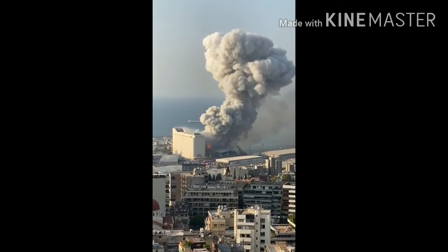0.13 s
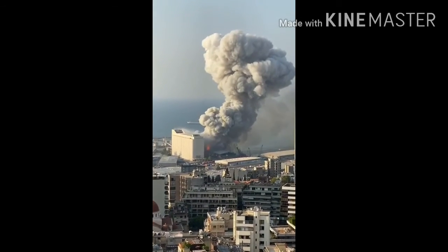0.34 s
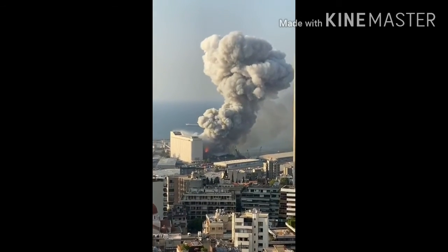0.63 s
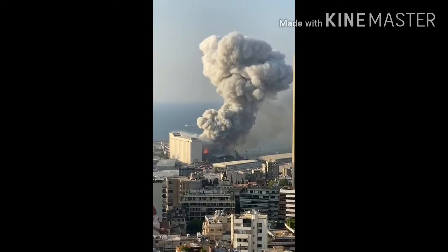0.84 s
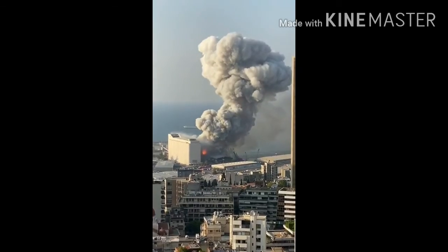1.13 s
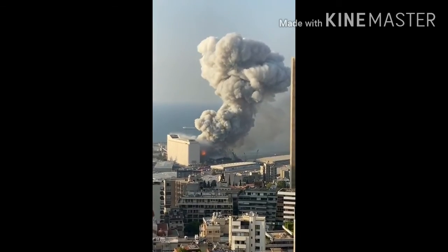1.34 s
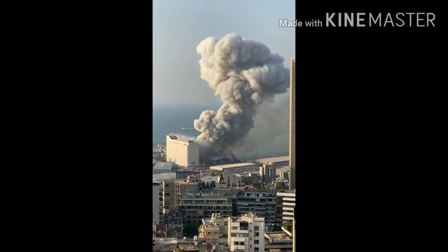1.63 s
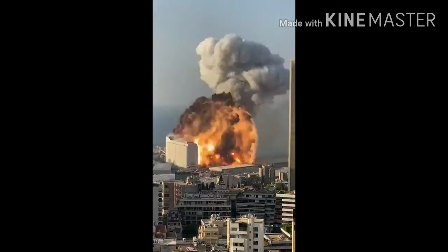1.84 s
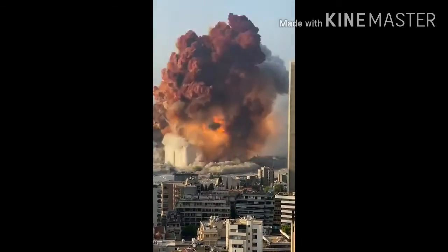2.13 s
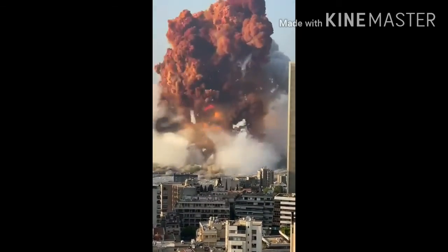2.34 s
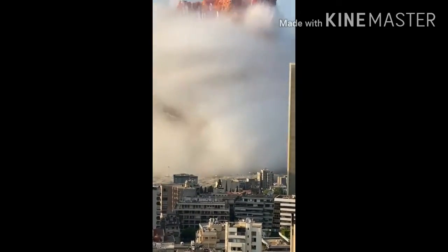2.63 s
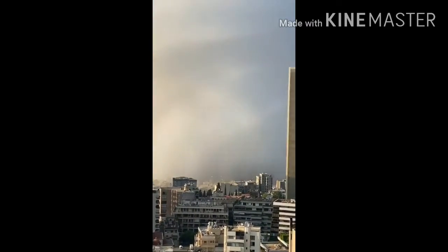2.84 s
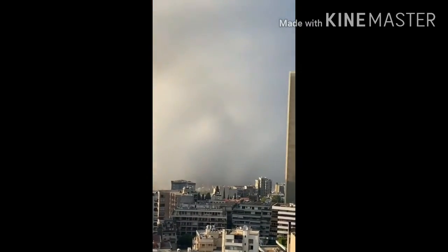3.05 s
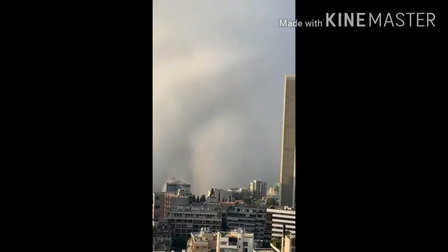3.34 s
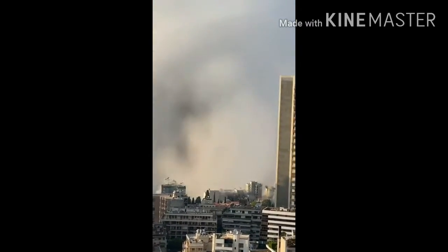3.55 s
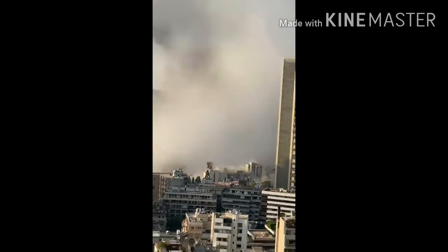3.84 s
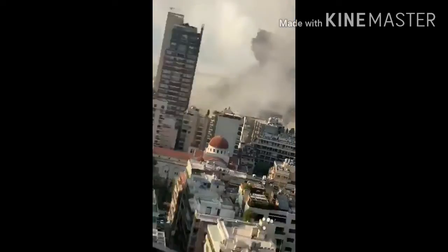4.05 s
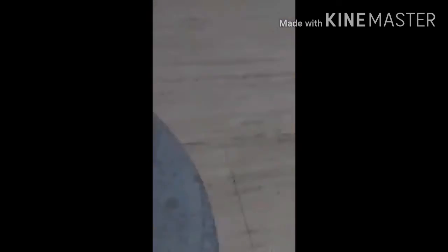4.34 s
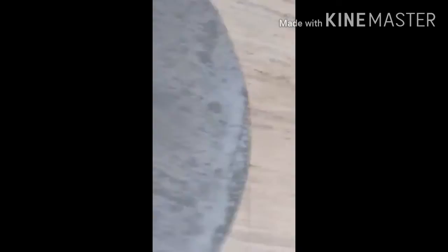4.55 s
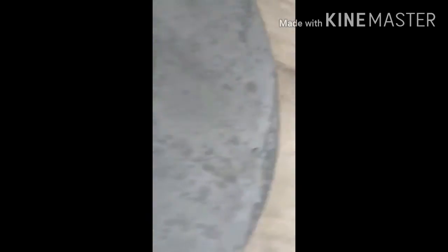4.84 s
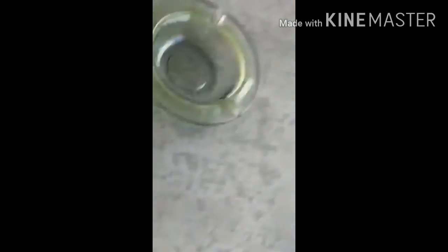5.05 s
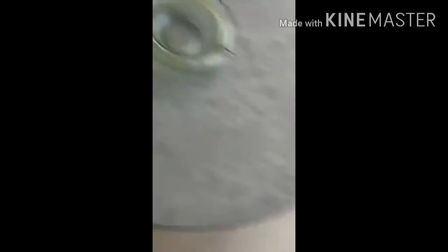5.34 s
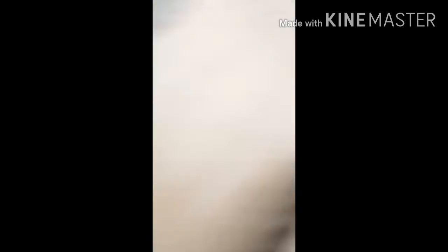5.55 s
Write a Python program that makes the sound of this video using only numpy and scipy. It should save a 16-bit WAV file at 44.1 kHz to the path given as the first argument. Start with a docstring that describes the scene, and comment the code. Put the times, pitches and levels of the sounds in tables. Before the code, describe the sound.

Steady muffled roar of a city fire, flickering and popping, heard from afar by a handheld phone. Then a heavy tremor swells in, building fittings chatter and hiss, and the rumble surges while slowly fading. Bumps and one hollow knock come as the phone drops towards the floor. Suddenly a far louder blast snaps, booms and distorts close at the microphone, with torn wind and falling bits.

```python
"""A huge fire roars across a city, heard by a phone on a balcony: clumped noise, with random pops and pressure pulses.
It explodes: the ground tremor comes first, and the building rumbles, rattles and hisses as bands of shaped noise.
Handling adds noise swells and a modal knock; as the phone sinks, the floor's echo combs the surrounding sound.
Then the air shock cracks over the phone as pressure jumps with port booms, its wind buffets and rasps
as gusting noise at both ports, and debris clatters down as scrapes with damped modes."""
import sys
import numpy as np
from scipy import signal
from scipy.fft import rfft, irfft, next_fast_len
from scipy.io import wavfile
from scipy.ndimage import uniform_filter1d, map_coordinates

SR = 44100
rng = np.random.default_rng(int(sys.argv[2]) if len(sys.argv) > 2 else 0)


def materialize(psi):
    """Save the field psi as 16-bit PCM at rate SR to the path in sys.argv[1].

    A 1-D psi becomes a single channel; in a 2-D psi each row is a channel.
    """
    bounded = np.clip(np.atleast_2d(psi).T, -1, 1)
    quanta = np.round(bounded * 32767).astype(np.int16)
    wavfile.write(sys.argv[1], SR, quanta)


N = 250929

# The ground wave: its first stir, then the main jolt (s).
STIR_S, JOLT_S = 2.354, 2.695
# The phone turns down, away from the street (s).
TURN_S, TURN_LENGTH_S = 4.2, 0.26


def amp(db):
    """Level law: decibels to an amplitude gain."""
    return 10 ** (np.asarray(db) / 20)


def unit(x):
    """Normalisation of x to an rms of 1."""
    return x / np.sqrt(np.mean(x ** 2) + 1e-20)


def even(x, window):
    """Short-term power equalisation: x at a steady strength, judged over window seconds."""
    power = uniform_filter1d(np.mean(x ** 2, axis=0), size=max(int(window * SR), 1))
    return unit(x / np.sqrt(np.abs(power) + 1e-6))


def along(points, hz):
    """Interpolation of (Hz, value) points on a logarithmic frequency axis."""
    point_hz, values = np.transpose(points)
    return np.interp(np.log(hz + 1), np.log(point_hz + 1), values)


def levels(rows):
    """Level contours: one gain track for each dB column, falling at 60 dB/s after the last row."""
    times, *columns = np.transpose(rows)
    t = np.arange(N) / SR
    fall_db = 60 * np.maximum(t - times[-1], 0)
    return [amp(np.interp(t, times, column) - fall_db) for column in columns]


def wobble(rate):
    """Slow random modulation: a smooth curve through rate random knots a second."""
    knots = rng.standard_normal(int(N * rate / SR) + 4)
    return map_coordinates(knots, [np.arange(N) * rate / SR])


def envelope(start, attack, ebb_db_per_s=0, hold=0):
    """Linear attack to 1, hold, then exponential decay."""
    age = np.arange(N) / SR - start
    return np.clip(age / attack, 0, 1) * amp(-ebb_db_per_s * np.maximum(age - attack - hold, 0))


def swell(s, half_width):
    """Gaussian hump of height 1 around time s, falling to 1/e at the half width."""
    hump = np.zeros(N)
    first = max(int((s - 3 * half_width) * SR), 0)
    last = min(int((s + 3 * half_width) * SR), N)
    near = np.arange(first, last)
    hump[near] = np.exp(-((near / SR - s) / half_width) ** 2)
    return hump


def swells(rows):
    """Superposition of humps given as (s, peak dB, half width s)."""
    return sum(amp(db) * swell(s, half_width) for s, db, half_width in rows)


def filtered(x, response):
    """Linear filtering: the spectrum of x times a response of frequency."""
    size = next_fast_len(N + SR // 4)
    spectrum = rfft(x, size) * response(np.fft.rfftfreq(size, 1 / SR))
    return irfft(spectrum, size)[..., :N]


def paired(pair, spectrum, width):
    """Mid-side stereo: two unrelated signals become left and right with a colour and a width."""
    def shares(hz):
        angle = np.arctan(amp(along(width, hz)))
        return amp(along(spectrum, hz)) * [np.cos(angle), np.sin(angle)]

    mid, side = filtered(pair, shares)
    return unit(np.array([mid + side, mid - side]))


def noise(spectrum, width, grain_db, grain_rate):
    """Modulated noise: stereo, rms 1, its strength wandering at grain_rate knots a second."""
    grains = amp(grain_db * wobble(grain_rate))
    return paired(rng.standard_normal((2, N)) * grains, spectrum, width)


def add(track, s, sound):
    """Superposition of a short sound on a track at time s."""
    part = track[..., round(s * SR):][..., :sound.shape[-1]]
    part += sound[..., :part.shape[-1]]


def push(hz, cycles):
    """Damped oscillation: a pressure pulse of peak 1 that swings a few times."""
    turns = hz * np.arange(SR // 8) / SR
    swing = np.sin(2 * np.pi * turns) * turns * np.exp(-2 * turns / cycles)
    return swing / np.abs(swing).max()


# Course of the fire. Each row: time in seconds, roar and rush in dB before brief swings and a small lift.
FIRE_COURSE = [(0, -16.5, -26.5), (.4, -18, -27), (.62, -17, -29), (.78, -17, -27), (1.35, -16, -28.5),
               (2.08, -20, -29), (2.22, -19, -31.5), (2.55, -22, -32.5), (2.85, -22, -29.5),
               (4.5, -23.5, -35), (5.05, -23.5, -33)]
# Brief flares and dips of the fire. Each row: centre in seconds, roar gain in dB, rush gain in dB,
# half width in seconds.
FIRE_SWINGS = [(.3, 2, 1, 0.07), (.64, -0.5, -0.5, 0.039), (.805, 2, 2, 0.026), (1.019, -4.5, 1, 0.012),
               (1.168, 0.5, 3.5, 0.014), (1.283, 1.5, 5.5, 0.03), (1.44, -1, 4, 0.046),
               (1.575, -0.5, -1, 0.018), (1.645, -3, 0.5, 0.015), (2.02, 2, -0.5, 0.073),
               (2.155, 0.5, -2, 0.025), (2.41, 3, 1.5, 0.031)]
# Spectra of roar and rush. Each row: frequency in Hz, relative density in dB per Hz.
ROAR_SPECTRUM = [(15, -71.5), (25, -34), (43, -21), (60, -15), (87, -6), (124, -5), (151, -1), (184, -5.5),
                 (210, -1), (300, -0.3), (400, -3.5), (494, -5.5), (591, -4.5), (657, -10), (900, -18),
                 (1170, -52.5), (1980, -120)]
RUSH_SPECTRUM = [(500, -33.5), (700, -3), (1050, -5.5), (1400, -13), (2000, -19.5), (3000, -30.5),
                 (4300, -45.5), (5500, -59.5), (9000, -81.5), (12000, -86.5)]
# Stereo width of far sound. Each row: frequency in Hz, side minus mid in dB.
FAR_WIDTH = [(100, -70), (190, -33), (260, -23), (350, -14), (600, -7.5), (900, -5), (1130, -5.5),
             (1450, -10), (1800, -19), (2600, -14), (3200, -15), (3700, -32), (5500, -24), (6500, -15),
             (9000, -11)]
# Far sound favours the left port. Each row: frequency in Hz, left minus right in dB.
LEFT_LEAN = [(310, 0), (400, 1.6), (540, 3.4), (650, 1), (800, 3.8), (1130, 3.8), (1700, .3), (3500, 0)]


def fire():
    """Incoherent summation: countless far bursts merge into a roar and a brighter rush that rise and dip."""
    roar, rush = levels(FIRE_COURSE)
    roar_db = sum(db * swell(s, half_width) for s, db, _, half_width in FIRE_SWINGS) + 0.73 * wobble(10)
    rush_db = sum(db * swell(s, half_width) for s, _, db, half_width in FIRE_SWINGS)
    low = roar * amp(0.7 + roar_db) * noise(ROAR_SPECTRUM, FAR_WIDTH, grain_db=0.5, grain_rate=56)
    high = rush * amp(1.15 + rush_db) * noise(RUSH_SPECTRUM, FAR_WIDTH, grain_db=0.5, grain_rate=63)
    halves = np.array([[.5], [-.5]])
    return filtered(low + high, lambda hz: amp(along(LEFT_LEAN, hz) * halves))


# Pops until the ground stirs: rate, peak over the roar for the lowest and strongest, random spread, pitch range.
POPS_PER_S = 22
POP_DB, POP_SPREAD_DB, POP_LOW_HZ, POP_HIGH_HZ = 3, 14, 327, 1260


def pops():
    """Random impulse sources: small far detonations follow the roar's level, weaker at higher pitch."""
    out = np.zeros(N)
    roar, _ = levels(FIRE_COURSE)
    for when, size, pitch in rng.uniform(size=(int(POPS_PER_S * STIR_S), 3)):
        hz = POP_LOW_HZ * (POP_HIGH_HZ / POP_LOW_HZ) ** pitch
        strength = amp(POP_DB - POP_SPREAD_DB * size) * POP_LOW_HZ / hz
        add(out, when * STIR_S, strength * push(hz, cycles=1.2))
    return roar * out


# Small things click and squeak as they shift. Each row: start in seconds, initial scuff level in dB,
# pitch in Hz, ring over scuff in dB, decay by 60 dB in seconds.
SMALL_CLICKS = [(.695, -58, 6460, -15.5, 0.1), (2.361, -51.5, 7040, -24, 0.071),
                (2.947, -42, 4430, -2, .05), (4.155, -26.5, 7600, -26, 0.0089),
                (4.545, -55.5, 4020, 17, 0.04)]


def clicks():
    """Damped resonance: a tiny noise scuff and a ring die away together."""
    out, t = np.zeros(N), np.arange(SR // 16) / SR
    for s, db, hz, ring_db, t60 in SMALL_CLICKS:
        ring = amp(ring_db) * np.sin(2 * np.pi * hz * t)
        scuff = rng.standard_normal(len(t))
        add(out, s, amp(db - 60 * t / t60) * (scuff + ring))
    return out


# The hand jerks and bumps the phone. Each row: centre in seconds, peak level in dB, half width in seconds.
HAND_BUMPS = [(4.015, -34, 0.011), (4.155, -17.5, 0.015), (4.395, -30, .012), (4.655, -25.5, 0.013)]
# Fingers rustle on the case. Each row: centre in seconds, peak level in dB, half width in seconds.
CASE_RUSTLES = [(.715, -65, .025), (1.3, -68, .022), (1.45, -71, .025), (1.92, -69, .02), (4.16, -46, .025)]
# Spectrum of a bump. Each row: frequency in Hz, relative density in dB per Hz.
BUMP_SPECTRUM = [(90, -19), (240, -10), (420, 8), (600, -15), (900, -21), (2000, -53)]
# Stereo width of sound made at the ports. Each row: frequency in Hz, side minus mid in dB.
NEAR_WIDTH = [(60, -25), (130, -17), (200, -11.5), (270, -8), (500, 0), (1200, 0), (1900, -11), (2600, -7),
              (3600, -13), (5500, -9), (7000, -5), (9000, -2.5)]


def handling():
    """Contact noise: the hand bumps the phone dully and rustles on its case."""
    bump = even(noise(BUMP_SPECTRUM, NEAR_WIDTH, grain_db=6, grain_rate=430), window=0.033)
    rustle = noise(HISS_SPECTRUM, NEAR_WIDTH, grain_db=2.0, grain_rate=170)
    return swells(HAND_BUMPS) * bump + swells(CASE_RUSTLES) * rustle


# Dull thumps. Each row: start in seconds, peak in dB, pitch in Hz.
DULL_THUMPS = [(0.721, -2, 230), (0.756, -12, 340), (.856, -8.5, 382), (1.091, -3, 270), (1.222, -7.5, 385),
               (1.775, -5.5, 264), (2.615, -18, 70), (2.658, -15, 86), (2.692, -5.5, 93), (4.003, -11, 280),
               (4.387, -12.5, 500), (4.562, -21, 300), (4.635, -13.5, 444), (5.131, -7.5, 92),
               (5.143, -9, 149), (5.159, -10.5, 167), (5.229, -9, 130), (5.341, -7, 82), (5.348, -9, 151),
               (5.402, -15, 103), (5.459, -14, 141), (5.617, -6.5, 81), (5.657, -10, 276)]


def thumps():
    """Long wavelengths: each thump is one low swing of pressure, alike at both ports."""
    out = np.zeros(N)
    for s, db, hz in DULL_THUMPS:
        add(out, s, amp(db) * push(hz, cycles=0.99))
    return out


# The first deep heave of the ground.
HEAVE_S, HEAVE_HOLD_S, HEAVE_DB = 2.41, 0.38, -29.5
# The rumble builds up to the jolt, then ebbs; random troughs deepen as the square of a wobble.
RUMBLE_DB, RUMBLE_EBB_DB_PER_S, TROUGH_DB, TROUGH_KNOTS_PER_S = -19.5, 2.5, 0.2, 13
# Strongest surges and troughs. Each row: centre in seconds, gain in dB, half width in seconds.
RUMBLE_SURGES = [(2.62, 1, .04), (2.69, 1.5, .03), (2.87, 3.5, 0.05), (3.02, -6, 0.02), (3.13, 2, .03),
                 (3.22, 1.5, 0.04), (3.43, 3, 0.031), (3.68, 3.5, 0.06), (3.83, -3.5, 0.043),
                 (3.985, -9, .018), (4.16, 1, 0.022), (4.225, -6, .016), (4.33, 3.5, 0.032),
                 (4.41, 4, 0.023), (4.52, 4.5, 0.039), (4.68, -8, .05)]
# Spectra of rumble and heave. Each row: frequency in Hz, relative density in dB per Hz.
RUMBLE_SPECTRUM = [(12, -40), (24, -11.5), (38, -9.5), (58, 6), (80, -4), (110, 0), (150, -5.5),
                   (230, -11.5), (315, -7), (380, -10), (460, -46), (800, -70.5)]
HEAVE_SPECTRUM = [(12, -23), (24, 15), (42, 4), (60, 0.5), (110, -46)]


def tremor():
    """Structure-borne sound: the ground wave heaves deeply, then rocks the building in ebbing surges."""
    surge_db = sum(db * swell(s, half_width) for s, db, half_width in RUMBLE_SURGES)
    surges = amp(surge_db - TROUGH_DB * wobble(TROUGH_KNOTS_PER_S) ** 2)
    strength = amp(RUMBLE_DB) * envelope(STIR_S, JOLT_S - STIR_S, RUMBLE_EBB_DB_PER_S) * surges
    heave = amp(HEAVE_DB) * envelope(HEAVE_S, attack=0.097, ebb_db_per_s=41, hold=HEAVE_HOLD_S)
    rumble_noise = even(noise(RUMBLE_SPECTRUM, FAR_WIDTH, grain_db=0.5, grain_rate=12), window=0.065)
    heave_noise = even(noise(HEAVE_SPECTRUM, FAR_WIDTH, grain_db=-1, grain_rate=7.2), window=0.047)
    return strength * rumble_noise + heave * heave_noise


# Bursts of chatter. Each row: centre in seconds, peak level in dB, half width in seconds.
CHATTER_BURSTS = [(2.755, -38.5, 0.018), (2.812, -29.5, 0.043), (2.875, -39, 0.027), (2.95, -35, .014),
                  (3, -35, .018), (3.09, -35, .035), (3.18, -36, 0.017), (3.46, -49, 0.032)]
# Spectrum of the rattle. Each row: frequency in Hz, relative density in dB per Hz.
RATTLE_SPECTRUM = [(600, -21.5), (1200, 6.5), (2000, 4.5), (3000, -1.5), (4500, -12), (6000, -33.5),
                   (9000, -43.5)]


def rattle():
    """Loose contacts: panes and fittings stir faintly, chatter harshly after the jolt and settle unevenly."""
    stir = amp(-47.5) * envelope(STIR_S, attack=0.156)
    settling = amp(-34.5) * envelope(JOLT_S, attack=0.15, ebb_db_per_s=10) * amp(.7 * wobble(32))
    chatter = swells(CHATTER_BURSTS) * noise(RATTLE_SPECTRUM, FAR_WIDTH, grain_db=2, grain_rate=400)
    return (stir + settling) * noise(RATTLE_SPECTRUM, FAR_WIDTH, grain_db=-0.3, grain_rate=120) + chatter


# The main hiss sets in just before the jolt; the turned phone shades it.
HISS_S, HISS_RISE_S, SHADE_DB = 2.646, 0.14, 5
# Swells of thin sizzle. Each row: centre in seconds, peak level in dB, half width in seconds.
SIZZLE_SWELLS = [(2.44, -57, 0.013), (2.51, -67, 0.03), (2.62, -67, 0.05), (2.87, -53, .035),
                 (2.98, -51, 0.092), (3.3, -63, 0.064), (4.87, -58, 0.039), (4.98, -52, 0.047)]
# Spectra of hiss and sizzle. Each row: frequency in Hz, relative density in dB per Hz.
HISS_SPECTRUM = [(3000, 1.5), (5000, 6.5), (6500, -0.5), (8000, -10), (9500, -14), (11000, -41.5),
                 (12000, -50.5)]
SIZZLE_SPECTRUM = [(5000, -22), (7500, -2), (9800, 7), (10800, -11.5), (11500, -32), (12500, -46)]


def hiss():
    """Dense impacts fuse into noise: a hiss that outlasts the rattle. Apart from it, a thin sizzle swells now
    and then high above."""
    stir = amp(-63) * envelope(STIR_S, attack=.01)
    shaken = amp(-43.0) * envelope(HISS_S, HISS_RISE_S, ebb_db_per_s=3.0) * amp(.8 * wobble(5.2))
    shade = amp(-SHADE_DB * envelope(TURN_S, TURN_LENGTH_S))
    fine_chatter = noise(HISS_SPECTRUM, FAR_WIDTH, grain_db=1.1, grain_rate=160)
    sizzle = swells(SIZZLE_SWELLS) * noise(SIZZLE_SPECTRUM, FAR_WIDTH, grain_db=4.0, grain_rate=46)
    return (stir + shaken) * shade * fine_chatter + sizzle


# One hollow knock on the phone's body. The row: start in seconds, left level in dB, right level in dB.
BODY_KNOCK = (3.999, -36, -8.5)
# Modes of the body. Each row: frequency in Hz, relative level in dB, decay by 60 dB in seconds.
BODY_MODES = [(280, -2, 0.05), (560, 2.5, 0.05), (715, -13, 0.03), (950, -9, 0.04), (1190, -18, 0.024),
              (1480, -13, .04)]


def knock():
    """Modal excitation: a soft blow rings the phone's body, louder at the right port."""
    out, t = np.zeros((2, N)), np.arange(SR // 8) / SR
    s, *port_db = BODY_KNOCK
    ring = sum(amp(db - 60 * t / t60) * np.sin(2 * np.pi * hz * t) for hz, db, t60 in BODY_MODES)
    soft_onset = 1 - np.exp(-t / 0.0018)
    add(out, s, amp(port_db)[:, None] * ring * soft_onset)
    return out


# The phone sinks towards the balcony floor. Each row: time in seconds, height in metres.
PHONE_HEIGHT = [(4.2, 1.05), (4.45, 0.795), (4.68, 0.697), (4.83, 0.553), (4.95, 0.502), (5.08, 0.424)]
# Strength of the floor's echo, the pitch above which it scatters away, and the speed of sound.
FLOOR_ECHO_DB, FLOOR_ECHO_HZ, SOUND_M_PER_S = -10.5, 2000, 343


def over_floor(x):
    """Comb interference: as the phone sinks, the floor's echo closes in and its hollow colour sweeps up."""
    t = np.arange(N) / SR
    delay = 2 * np.interp(t, *np.transpose(PHONE_HEIGHT)) / SOUND_M_PER_S
    dull = filtered(x, lambda hz: 1 / (1 + (hz / FLOOR_ECHO_HZ) ** 4))
    echo = np.array([np.interp(t - delay, t, port) for port in dull])
    share = amp(FLOOR_ECHO_DB) * envelope(TURN_S, TURN_LENGTH_S)
    return (x + share * echo) / np.sqrt(1 + share ** 2)


# Cracks and port booms; the first row is almost only a low boom.
# Each row: start of the snap in seconds, pressure jump in dB, port boom in dB.
SHOCK_CRACKS = [(5.116, -45, -15), (5.123, -15, -8), (5.126, 6.5, 0.5), (5.138, -21, -3), (5.164, -5, -21),
                (5.182, -6, -24), (5.196, -7, -19), (5.226, -5, -12), (5.24, -25, -7), (5.25, -6, -17),
                (5.301, -19, -15), (5.373, -19, -28), (5.518, -7, -22), (5.523, -4, -9)]


def shock():
    """Blast wave: a steep pressure jump and its suction; each port booms briefly in its own way."""
    out, t = np.zeros((2, N)), np.arange(SR // 16) / SR
    u = t / 0.00018  # time in units of the positive phase
    left = push(450, cycles=1.9) + 0.43 * push(1130, cycles=3.0)
    right = push(646, cycles=1.3) + 0.11 * push(1367, cycles=17.0)
    boom = np.array([left, right])
    for s, db, boom_db in SHOCK_CRACKS:
        grit = 0.071 * rng.standard_normal((2, len(t))) * amp(-60 * t / 0.015)
        snap = (1 - u) * np.exp(-u) + grit
        add(out, s, amp(db) * snap)
        add(out, s - .002, amp(boom_db) * boom)  # each boom starts 2 ms before its snap
    return out


# Tearing gusts. Each row: start in seconds, level in dB before gaps and lull, length in seconds.
TEARING_GUSTS = [(5.134, -33, 0.0072), (5.146, -19, 0.019), (5.167, -25, 0.0016), (5.168, -17.5, 0.018),
                 (5.19, -16.5, .007), (5.199, -20.5, 0.015), (5.217, -16.5, 0.011), (5.233, -23.5, 0.0033),
                 (5.245, -20.5, 0.0088), (5.28, -24, 0.0071), (5.29, -23, 0.013), (5.311, -29, 0.0073),
                 (5.324, -25.5, .011), (5.349, -31, 0.0073), (5.356, -31, 0.01), (5.387, -43, .008),
                 (5.414, -35.5, 0.014), (5.435, -40, 0.011), (5.444, -36, 0.0053), (5.462, -35, 0.073),
                 (5.576, -26.5, 0.011), (5.596, -34, 0.017), (5.617, -32.5, 0.051), (5.678, -36.5, 0.02)]
TEAR_EDGE_S = 0.0012  # how fast a gust sets in and stops


def tears():
    """Gating of turbulence: each gust switches on, holds and cuts off."""
    out, t = np.zeros(N), np.arange(SR // 12) / SR
    for s, db, length in TEARING_GUSTS:
        time_left = length - t + TEAR_EDGE_S / 2
        add(out, s, amp(db) * np.clip(np.minimum(t, time_left) / TEAR_EDGE_S, 0, 1))
    return out


# Gaps between the gusts. Each entry: centre in seconds.
GUST_GAPS = [5.146, 5.172, 5.232, 5.288, 5.311, 5.324, 5.341, 5.38, 5.454]
# Depth of a gap, its half width and the pitch above which it acts.
GAP_DB, GAP_HALF_WIDTH_S, GAP_ABOVE_HZ = 8, 0.0032, 350


def slackened(wind):
    """Frequency-dependent modulation: in the gaps the deep buffeting goes on while the rest weakens."""
    deep = filtered(wind, lambda hz: 1 / (1 + (hz / GAP_ABOVE_HZ) ** 6))
    gap_db = GAP_DB * sum(swell(s, GAP_HALF_WIDTH_S) for s in GUST_GAPS)
    return deep + (wind - deep) * amp(-gap_db)


# The wind, rising from the first low boom: a fierce first blow, a slow ebb and one lull.
BLOW_S, BUFFET_DB, BUFFET_EBB_DB_PER_S = 0.11, -11, 6
LULL_S, LULL_HALF_WIDTH_S, LULL_DB = 5.556, 0.031, 8
# As the wind slackens its rasp loses treble: loss, above this pitch, over this time.
DULL_DB, DULL_HZ, DULL_S = 8, 7200, 0.14
# Spectra of buffeting, hollow boom and rasp. Each row: frequency in Hz, relative density in dB per Hz.
BUFFET_SPECTRUM = [(11, -41), (18, -46), (43, -4.5), (73, -3), (182, -10), (272, -14.5), (330, -14.5),
                   (408, -21), (535, -16.5), (589, -19), (1800, -42), (2340, -45.5), (3960, -120)]
BOOM_SPECTRUM = [(70, -6), (140, 4), (220, 0), (330, -13), (520, 1), (750, -12), (1400, -14), (2500, -65)]
RASP_SPECTRUM = [(250, 14.5), (600, 11), (1200, 5), (2200, -1), (3500, -3.5), (6500, -7.5), (9000, -9.5),
                 (11000, -18.5), (12500, -27)]


def gale():
    """Turbulent flow noise: the blast wind booms, buffets the ports and crackles over their edges, then dulls."""
    wind_s = SHOCK_CRACKS[0][0]
    buffet = amp(BUFFET_DB) * envelope(wind_s, attack=0.0039, ebb_db_per_s=BUFFET_EBB_DB_PER_S)
    boom = amp(-19.5) * envelope(wind_s, attack=0.0057, ebb_db_per_s=94, hold=BLOW_S)
    first_blow = amp(-27) * envelope(wind_s, attack=0.0078, ebb_db_per_s=218, hold=BLOW_S)
    after_wind = amp(-35.5) * envelope(wind_s, attack=0.0031)
    low = buffet * even(noise(BUFFET_SPECTRUM, NEAR_WIDTH, grain_db=3.5, grain_rate=77), window=0.0374)
    hollow = boom * even(noise(BOOM_SPECTRUM, NEAR_WIDTH, grain_db=3.5, grain_rate=150), window=0.025)
    crackle = even(noise(RASP_SPECTRUM, NEAR_WIDTH, grain_db=3, grain_rate=1500), window=.012)
    treble = filtered(crackle, lambda hz: 1 - 1 / (1 + (hz / DULL_HZ) ** 8))
    treble_gain = amp(-DULL_DB * envelope(wind_s + BLOW_S, DULL_S))
    rasp = (first_blow + after_wind + tears()) * (crackle - treble * (1 - treble_gain))
    lull = amp(-LULL_DB * swell(LULL_S, LULL_HALF_WIDTH_S))
    return lull * slackened(low + hollow + rasp)


# Loose things thrown by the blast land. Each row: start in seconds, level in dB, pitch in Hz.
DEBRIS_LANDINGS = [(5.136, -12, 1230), (5.329, -22.5, 1860), (5.355, -26, 800), (5.389, -22, 1160),
                   (5.393, -16, 565), (5.400, -19, 790), (5.412, -24, 1320), (5.420, -22.5, 1370),
                   (5.450, -23.5, 2330), (5.46, -21, 1680), (5.502, -22, 960), (5.574, -20, 680),
                   (5.648, -22, 1290), (5.658, -24, 520)]
# Their modes. Each row: multiple of the pitch, mean relative level in dB, decay by 60 dB in seconds.
LANDING_MODES = [(1, -3, .03), (1.37, -6.5, 0.027), (2.15, -13, .015)]
# Scrape of each landing, relative to its level, and its decay by 60 dB.
SCRAPE_DB, SCRAPE_T60_S = -9, 0.03


def debris():
    """Impact and modal decay: each piece lands with a short scrape and a dead ring that differs between ports."""
    out, t = np.zeros((2, N)), np.arange(SR // 12) / SR
    for s, db, hz in DEBRIS_LANDINGS:
        ring = np.zeros((2, len(t)))
        for ratio, mode_db, t60 in LANDING_MODES:
            port_db = mode_db + rng.normal(0, 2.3, (2, 1))
            ring += amp(port_db - 60 * t / t60) * np.sin(2 * np.pi * hz * ratio * t)
        band = signal.butter(2, [hz / 2, min(2 * hz, SR / 3)], "band", fs=SR, output="sos")
        scrape = unit(signal.sosfilt(band, rng.standard_normal(len(t))))
        scrape *= amp(SCRAPE_DB - 60 * t / SCRAPE_T60_S)
        add(out, s, amp(db) * (ring + scrape))
    return out


def scene():
    """Superposition of fire, ground wave, handling and air blast."""
    around = over_floor(fire() + pops() + tremor() + rattle() + hiss())
    at_phone = clicks() + handling() + thumps() + knock()
    return around + at_phone + shock() + gale() + debris()


# The right port lags the left around its resonances. Each row: frequency in Hz, lag in radians.
RIGHT_PORT_LAG = [(2050, 0), (2580, 1.1), (3200, 0), (4150, 0), (4500, 1), (4900, 3.2), (5220, 6.1),
                  (7300, 6.7), (9300, 9), (12000, 9.4)]
TOP_HZ = 11900  # band limit


def record(dry):
    """Transducer limits: the ports differ in phase, the largest peaks round off and the top band is cut."""
    right_only = np.array([[0], [1]])
    ports = filtered(dry, lambda hz: np.exp(-1j * along(RIGHT_PORT_LAG, hz) * right_only))
    squeezed = ports / (1 + np.abs(ports / .96) ** 6) ** (1 / 6)
    return filtered(squeezed, lambda hz: 1 / (1 + (hz / TOP_HZ) ** 56))


dry = scene()
out = record(dry)
materialize(out)
```